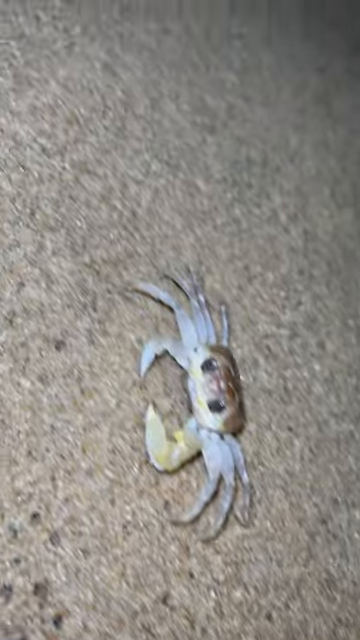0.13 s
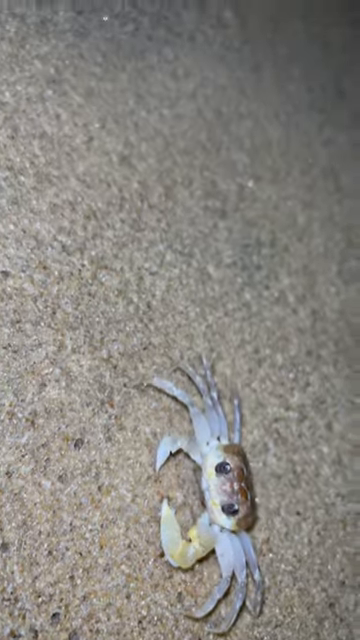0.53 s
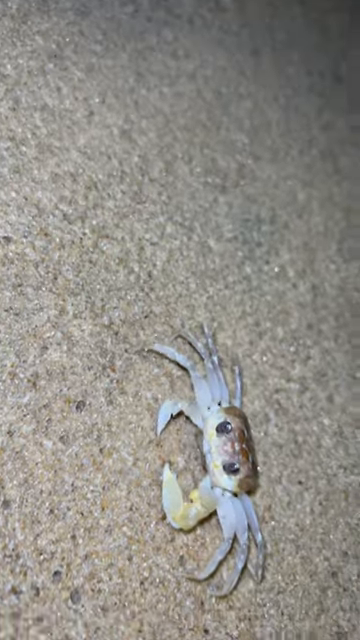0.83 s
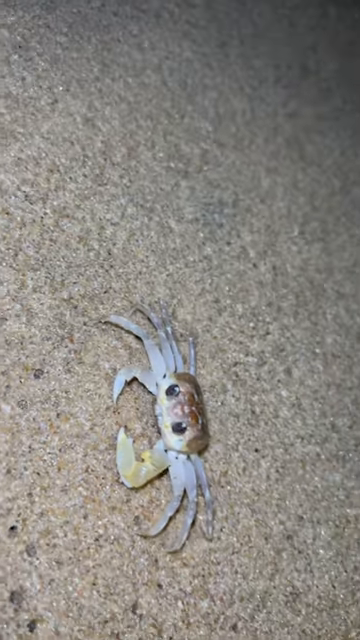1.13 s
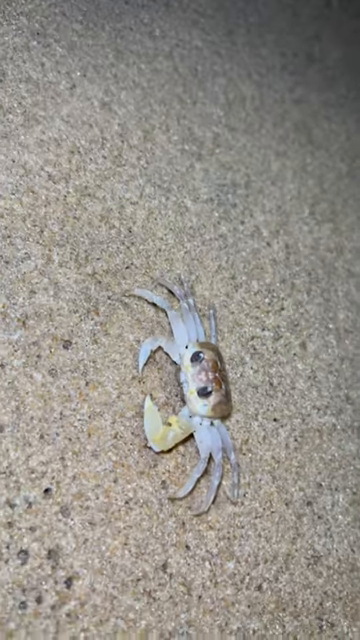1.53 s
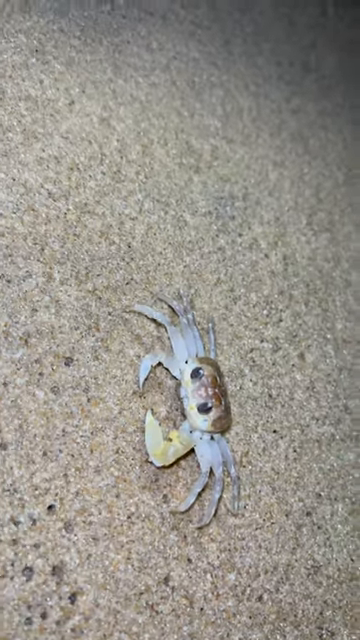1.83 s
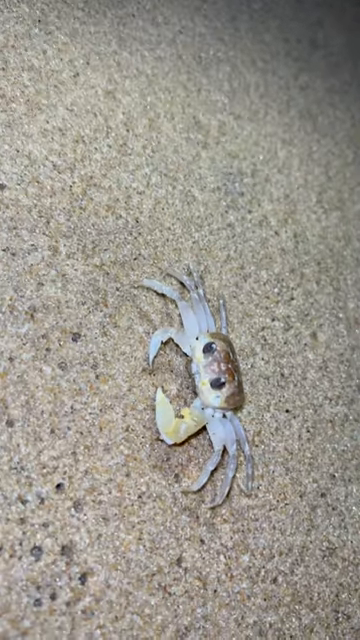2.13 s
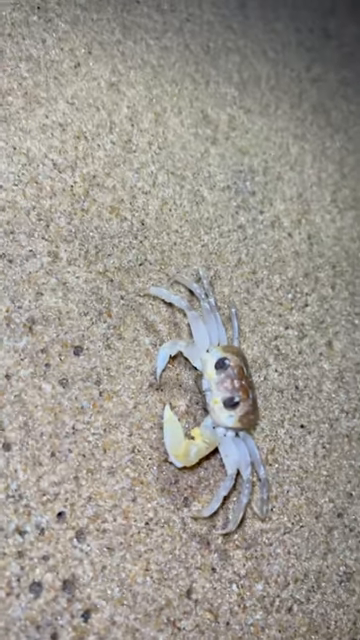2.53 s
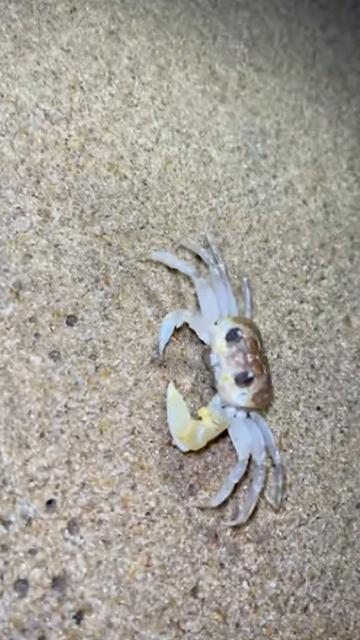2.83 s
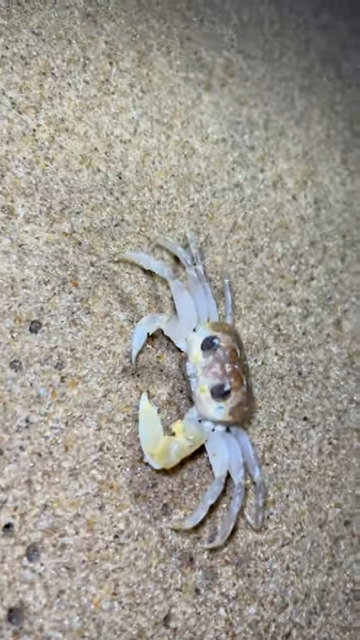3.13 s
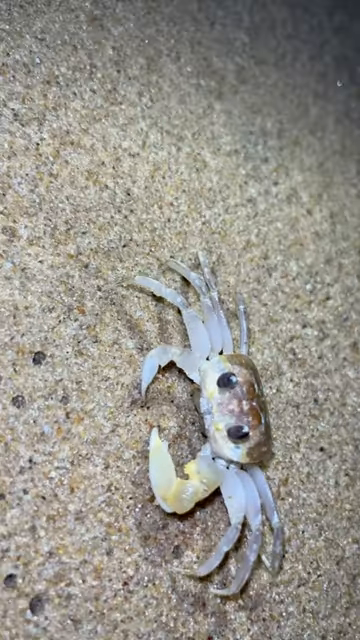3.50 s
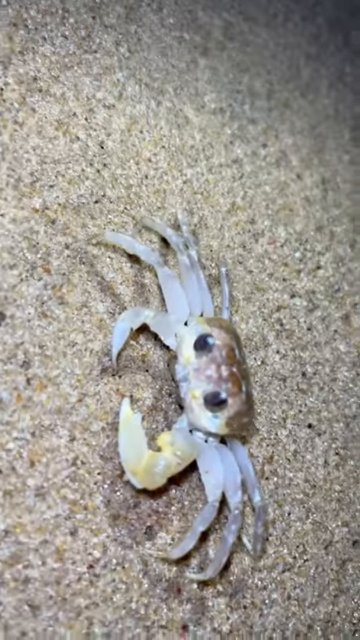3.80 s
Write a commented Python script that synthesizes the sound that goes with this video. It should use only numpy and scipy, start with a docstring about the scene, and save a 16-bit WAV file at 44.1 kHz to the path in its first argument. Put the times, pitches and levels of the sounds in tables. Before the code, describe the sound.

Distant surf gives a steady, dull, hollow low roar for about four seconds, its bass and body gently swelling. A faint thin fizz of foam lies above. From about 1.3 s a slightly brighter breaking wave emerges, growing to its fullest around 3 s and holding to the end. Soft deep wind bumps buffet the phone microphone between 1.8 and 3.4 s, strongest near 2.2 s. Open beach, stereo.

```python
"""Distant surf roars steadily on a sandy beach at night, heard by a phone held close over the sand.
Roar: shaped noise in four bands, the upper three each swelling on its own curve. Breaker: brighter
noise that grows in the second half. Foam: faint high hiss plus random pops. Breeze: a few soft, deep
gusts on the microphone, each a wandering low tone inside a noise rumble."""
import sys
import numpy as np
from scipy import signal
from scipy.fft import rfft, irfft
from scipy.io import wavfile
from scipy.ndimage import map_coordinates

SR = 44100
rng = np.random.default_rng(int(sys.argv[2]) if len(sys.argv) > 2 else 0)


def unload_audio(sound):
    """Save the sound as a 16-bit wav file, at the path given as the first command line argument."""
    columns = np.transpose(np.atleast_2d(sound))
    # keep every value between -1 and 1, then stretch to whole-number steps
    steps = np.round(np.clip(columns, -1, 1) * 32767)
    wavfile.write(sys.argv[1], SR, steps.astype(np.int16))


N = 174636
TIME_S = np.arange(N) / SR
FREQ_HZ = np.maximum(np.arange(N // 2 + 1) * SR / N, 1)


def undb(db):
    """Decibels to amplitude gain."""
    return 10 ** (np.asarray(db) / 20)


def over_time(table, column=1):
    """Table column, interpolated linearly in time."""
    rows = np.array(table)
    return np.interp(TIME_S, rows[:, 0], rows[:, column])


def over_pitch(table, column=1):
    """Table column, interpolated linearly in log frequency."""
    rows = np.array(table)
    return np.interp(np.log(FREQ_HZ), np.log(rows[:, 0]), rows[:, column])


def unit(x):
    """Scale to rms 1 over all channels."""
    return x / np.sqrt(np.mean(x ** 2))


def walk(steps_per_s):
    """Smooth random drift: spline through Gaussian steps."""
    steps = rng.standard_normal(512)
    return map_coordinates(steps, [TIME_S * steps_per_s], order=2, mode="wrap")


def split(x, crossover_hz):
    """Complementary zero-phase low and high parts."""
    high = irfft(rfft(x) / (1 + (crossover_hz / FREQ_HZ) ** 6), N)
    return x - high, high


def churn(changes_per_s, depth_db, count=10):
    """Stereo noise in log-spaced bands whose levels drift independently."""
    noise = rfft(rng.standard_normal((2, N)))
    octaves = np.log2(FREQ_HZ / 32)
    position = np.clip(octaves / 9, 0, 1) * (count - 1)
    total = 0
    for k in range(count):
        overlap = np.maximum(1 - abs(position - k), 0)  # triangular band
        total = total + irfft(noise * overlap, N) * undb(depth_db * walk(changes_per_s))
    return total


def ports(pair, spectrum, likeness, balance_db=0, lead_rad=0):
    """Mix two unrelated signals into left and right ports with set coherence, balance and phase."""
    mid, side = rfft(pair) * undb(over_pitch(spectrum))
    coherence = np.clip(likeness, 0, .99)
    mid = mid * np.sqrt(1 + coherence)
    side = side * np.sqrt(1 - coherence)
    left = (mid + side) * undb(balance_db / 2) * np.exp(1j * lead_rad)
    right = (mid - side) * undb(-balance_db / 2)
    return unit(irfft(np.array([left, right]), N))


# surf, left minus right: f/Hz, level/dB
SURF_BALANCE = [(40, 4), (80, -1), (150, -2), (250, -2.5), (350, -4.5), (450, -2.5), (570, -7.5), (750, -7),
                (1000, -4.5), (1500, -1)]
# surf, coherence of the two ports: f/Hz, likeness/0-1
SURF_LIKENESS = [(50, .87), (100, .66), (160, .73), (245, .44), (345, .86), (500, .47), (580, .52),
                 (800, .35), (1000, .55), (1300, .67), (2000, .25)]
# surf, phase lead of the left port: f/Hz, lead/rad
SURF_LEAD = [(60, -.45), (170, 0), (250, -.4), (390, -.35), (500, -1.75), (600, -.85), (740, -3.5),
             (900, -4.8), (1500, -5.2)]


def surf(water, spectrum):
    """Water noise from the sea, to the right of the phone: port differences vary with frequency."""
    return ports(water, spectrum, over_pitch(SURF_LIKENESS), over_pitch(SURF_BALANCE), over_pitch(SURF_LEAD))


# roar spectrum, relative density: f/Hz, level/dB
ROAR_SPECTRUM = [(22, -42), (45, -4.5), (65, -1.5), (100, 0), (150, -0.5), (200, -4), (255, -6),
                 (300, -3.5), (345, -1.5), (400, -5.5), (470, -7.5), (570, -9), (700, -15.5), (850, -22.5),
                 (1000, -29), (1400, -37), (2200, -59), (8000, -95)]
# roar swells: t/s, bass level/dB, body level/dB, top level/dB
ROAR_SWELL = [(0, -5, -1, -2), (.17, -1, 2, .8), (.35, -4, -2.5, 0.5), (.6, 0, 1.2, -2.5),
              (.75, -2, -0.5, 0), (1, 0, -0.5, -1), (1.13, 1.5, -2.5, 2.5), (1.32, -1, 4.5, -0.5),
              (1.52, -2, 1, -1.7), (1.7, 1.5, 1, 0), (1.86, 1.8, 0.7, -0.5), (2.02, 5, 0, 0.9),
              (2.4, -.5, .6, 1), (2.6, 0.5, .9, -.5), (3.02, .5, 2.5, -.3), (3.27, 3, -2, 0),
              (3.5, 3.5, 1.5, -1), (3.96, -1, 2.5, 0)]
ROAR_DB = -19  # rms before swells
ROAR_DEEP_HZ, ROAR_BASS_HZ, ROAR_TOP_HZ = 112, 224, 445  # crossovers


def roar():
    """Far waves sum to dull noise: bass, hollow body and top swell over an unswelled deep rumble."""
    water = churn(changes_per_s=17, depth_db=0.46)
    deep, rest = split(surf(water, ROAR_SPECTRUM), ROAR_DEEP_HZ)
    bass, rest = split(rest, ROAR_BASS_HZ)
    body, top = split(rest, ROAR_TOP_HZ)
    bass = bass * undb(over_time(ROAR_SWELL, column=1))
    body = body * undb(over_time(ROAR_SWELL, column=2))
    top = top * undb(over_time(ROAR_SWELL, column=3))
    return (deep + bass + body + top) * undb(ROAR_DB)


# breaker spectrum, relative density: f/Hz, level/dB
BREAKER_SPECTRUM = [(22, -15), (70, -4), (100, -5), (145, 9), (230, -15), (400, -4.5), (520, -9),
                    (750, -6.5), (950, -11), (1250, -18), (1600, -25), (2100, -32.5), (3000, -50),
                    (8000, -90)]
# breaker growth: t/s, level/dB
BREAKER_GROWTH = [(0, -12), (.25, -19), (.55, -20), (.85, -31), (1.35, -11), (1.6, -12), (1.9, -11),
                  (2.1, -7), (2.3, -8.5), (2.55, -6), (2.75, -2), (2.87, -3.5), (3.05, -0.5), (3.4, 0),
                  (3.67, -0.9), (3.8, -0.7), (3.96, -0.3)]
BREAKER_DB = -23  # rms before growth


def breaker():
    """One wave breaks: churning noise, brighter than the roar, follows a growth curve."""
    water = churn(changes_per_s=18, depth_db=1.0, count=16)
    return surf(water, BREAKER_SPECTRUM) * undb(BREAKER_DB + over_time(BREAKER_GROWTH))


POPS_PER_S, POP_SPREAD_DB = 500, 3  # mean rate per channel; size scale


def bubbles():
    """Bursting bubbles: sparse random impulses of either sign, sizes exponential in dB."""
    size_db = POP_SPREAD_DB * np.minimum(rng.exponential(size=(2, N)), 5)
    sign = rng.choice([-1, 1], (2, N))
    bursts = rng.random((2, N)) < POPS_PER_S / SR
    return unit(undb(size_db) * sign * bursts)


# foam spectrum, relative density: f/Hz, level/dB
FOAM_SPECTRUM = [(300, -29), (700, -2), (1400, -5), (2000, -3), (2700, 1), (3500, 0.5), (4400, 2.5),
                 (5000, 0), (6100, -6), (7000, -3.5), (8000, -6.5), (9500, -9), (11500, -11), (14000, -12)]
# foam swells: t/s, whole level/dB, extra treble level/dB
FOAM_SWELL = [(0, 2.5, -2), (.35, 0.8, -2), (.82, 0.7, -0.3), (1, 2.5, -1), (1.3, 3.5, -2.6),
              (1.55, 1.4, -1.5), (2.15, 1, 0), (2.8, 1.1, .3), (3.2, 1.5, 0.6), (3.96, 0.2, .8)]
# foam, left minus right: f/Hz, level/dB
FOAM_BALANCE = [(1400, 1.5), (2000, 7.5), (3000, 0.5), (4300, -4), (5200, -2), (6500, 0.5), (12000, -0.5)]
# foam, coherence of the two ports: f/Hz, likeness/0-1
FOAM_LIKENESS = [(1500, .3), (2400, .1), (3200, .38), (3800, .12), (4700, .15), (5200, .7), (6000, .97),
                 (7000, .75), (8000, .9), (9100, .75), (10200, .97), (13500, .75)]
# foam, phase lead of the left port: f/Hz, lead/rad
FOAM_LEAD = [(1500, 1.1), (2100, 0), (2650, 2.6), (3400, 3.1), (4200, 0), (4900, 1.9), (6000, 3.14),
             (6900, 4.5), (7900, 6.28), (9100, 7.6), (10200, 9.42), (11200, 10.9), (12300, 12.57),
             (14000, 14.5)]
FOAM_DB, POP_DB = -41, -11  # rms before swells; pops re hiss
FOAM_TREBLE_HZ = 5300  # crossover


def foam():
    """Thin, faint hiss: gently fluctuating noise plus bubble impulses, treble swelling separately."""
    pops = undb(POP_DB) * bubbles()
    fizz = churn(changes_per_s=24, depth_db=1.1, count=40) + pops
    hiss = ports(fizz, FOAM_SPECTRUM, over_pitch(FOAM_LIKENESS), over_pitch(FOAM_BALANCE),
                 over_pitch(FOAM_LEAD))
    body, treble = split(hiss, FOAM_TREBLE_HZ)
    treble = treble * undb(over_time(FOAM_SWELL, column=2))
    return (body + treble) * undb(FOAM_DB + over_time(FOAM_SWELL))


# wind rumble spectrum, relative density: f/Hz, level/dB
WIND_SPECTRUM = [(20, -10), (35, -5), (58, 16), (85, 9), (120, 0), (200, -9), (400, -16), (2000, -100)]
# gusts: peak t/s, half length to 1/e /s, level/dB
GUSTS = [(1.825, 0.024, -8), (2.06, 0.035, 4.5), (2.12, 0.028, 3.5), (2.182, 0.024, 10), (2.294, 0.023, 3),
         (2.374, 0.043, 3), (2.713, 0.026, 0.5), (2.891, 0.017, 1.5), (3.22, 0.04, 5.5),
         (3.327, 0.033, 2.5)]
WIND_LIKENESS = 0.59  # port coherence, 0-1
EDDY_HZ, EDDY_WANDER, EDDY_CHANGES_PER_S = 65.3, 0.25, 45  # centre; log-frequency spread; drift rate
EDDY_DB, WIND_DB = -24, -32.5  # flutter and rumble rms before gusts


def wind():
    """Gusts shed eddies over the ports: a frequency-wandering sine plus low noise, Gaussian envelopes."""
    push = 0
    for peak_s, half_s, gust_db in GUSTS:
        push = push + undb(gust_db) * np.exp(-((TIME_S - peak_s) / half_s) ** 2)
    shedding_hz = EDDY_HZ * np.exp(EDDY_WANDER * walk(EDDY_CHANGES_PER_S))
    flutter = unit(np.sin(2 * np.pi * np.cumsum(shedding_hz) / SR))
    rumble = ports(rng.standard_normal((2, N)), WIND_SPECTRUM, WIND_LIKENESS)
    return push * (flutter * undb(EDDY_DB) + rumble * undb(WIND_DB))


def scene():
    """Sum of roar, breaker, foam and breeze."""
    return roar() + breaker() + foam() + wind()


TOP_HZ = 13850


def record(dry):
    """Phone's treble limit: steep elliptic low-pass, 0.2 dB ripple, 80 dB stopband."""
    lowpass = signal.ellip(12, .2, 80, TOP_HZ, fs=SR, output="sos")
    return signal.sosfilt(lowpass, dry)


dry = scene()
out = record(dry)
unload_audio(out)
```